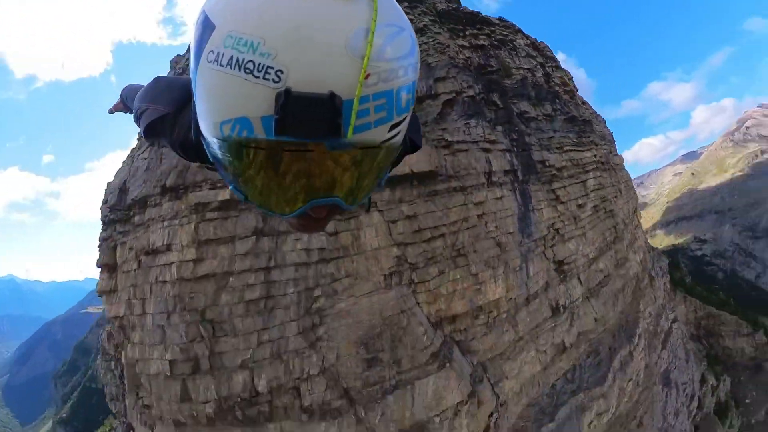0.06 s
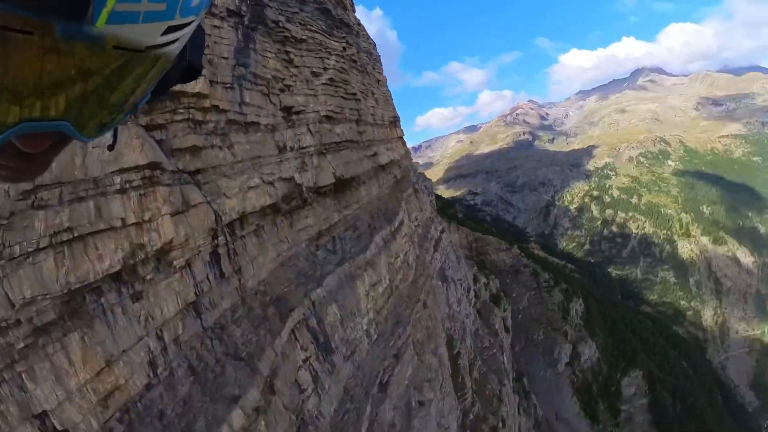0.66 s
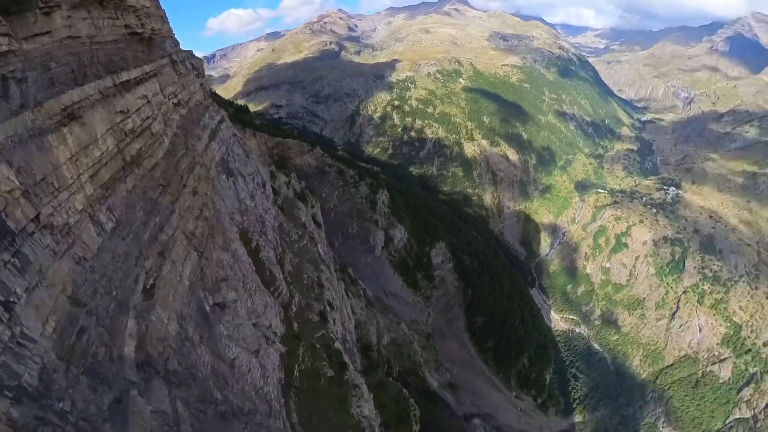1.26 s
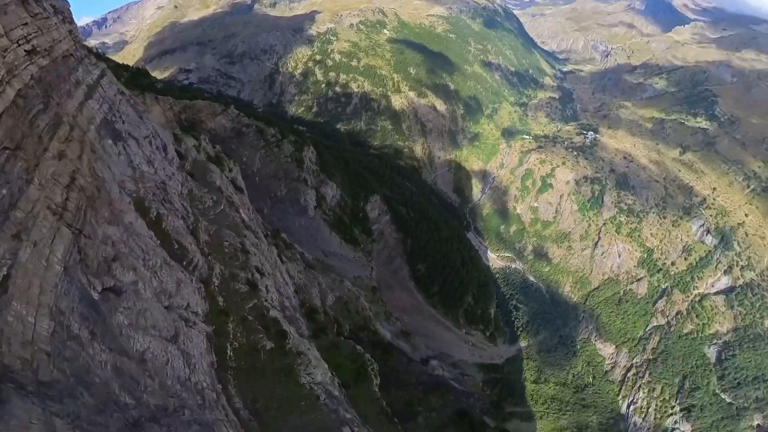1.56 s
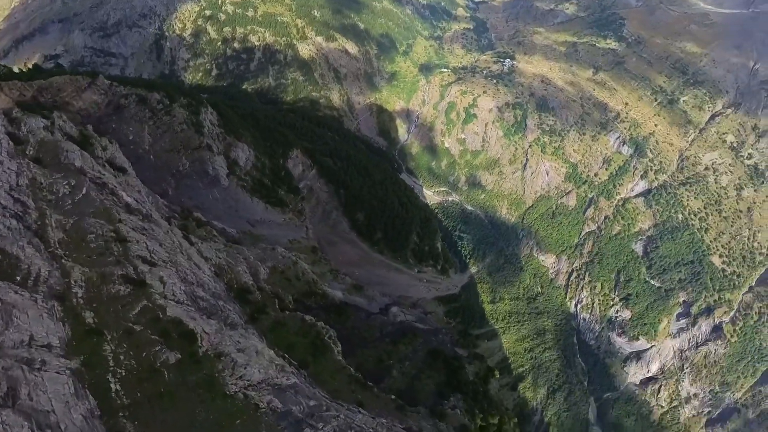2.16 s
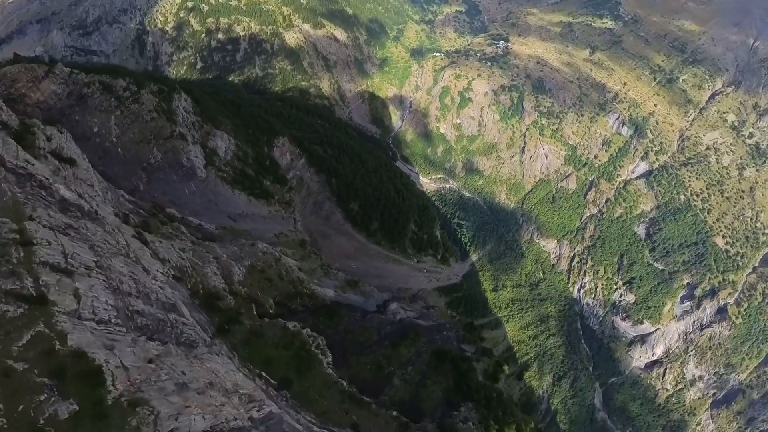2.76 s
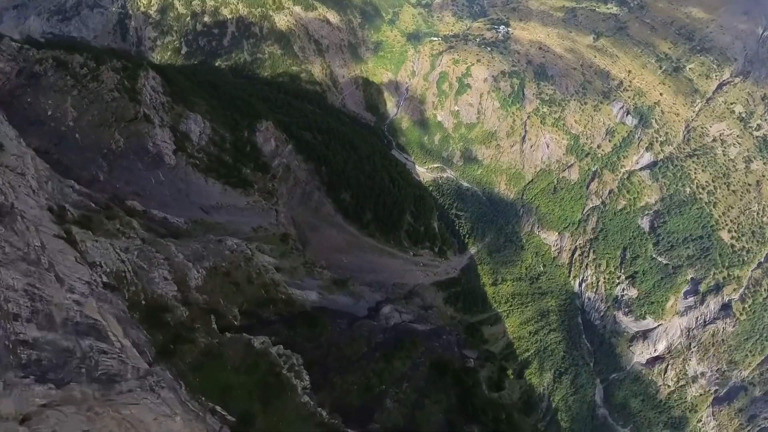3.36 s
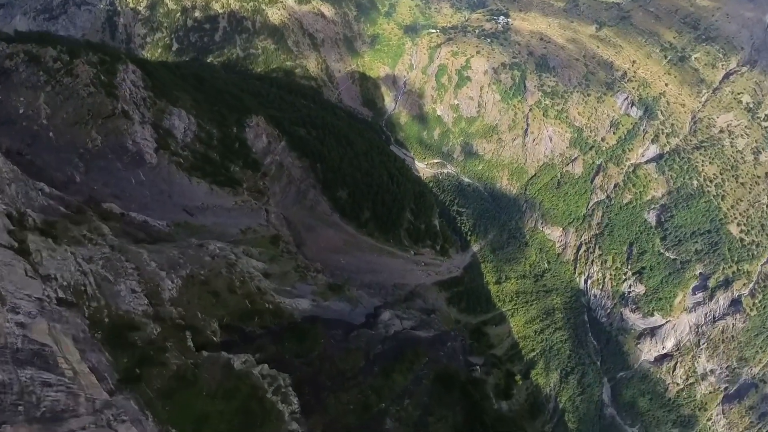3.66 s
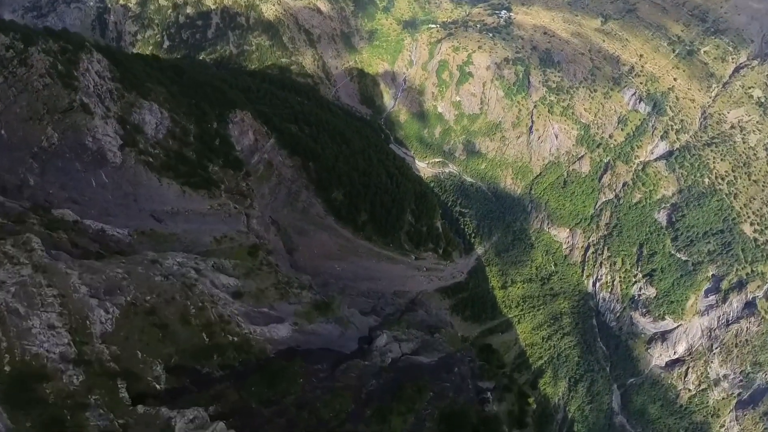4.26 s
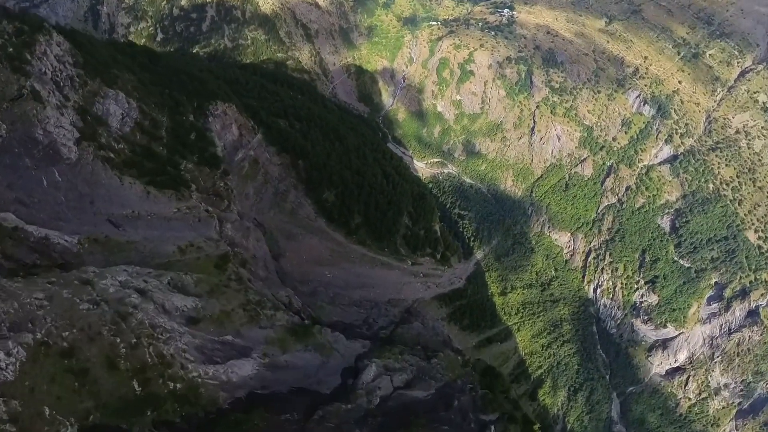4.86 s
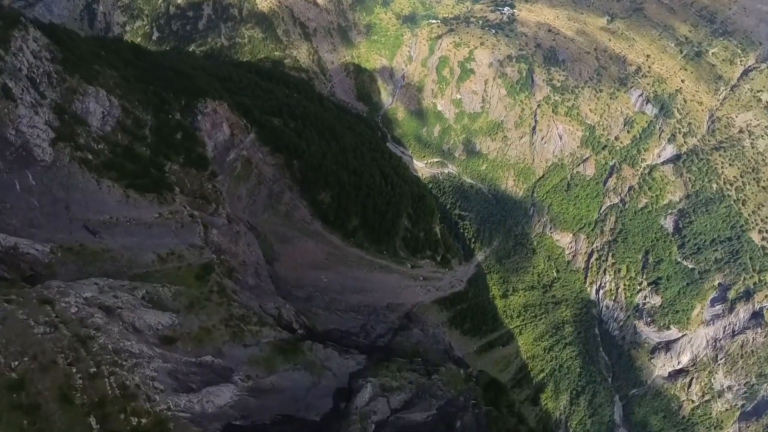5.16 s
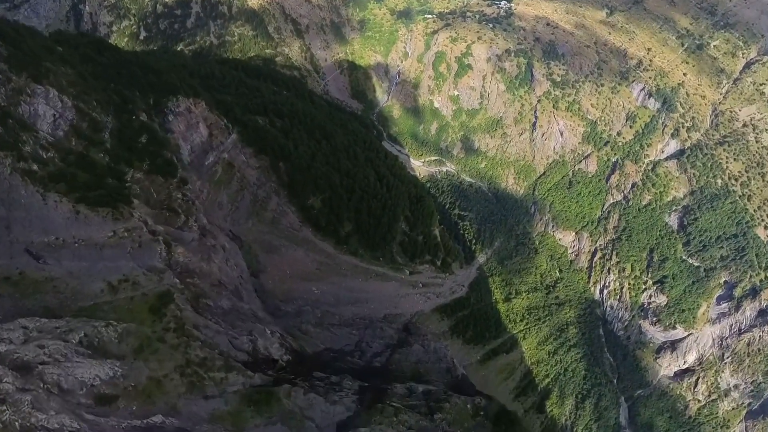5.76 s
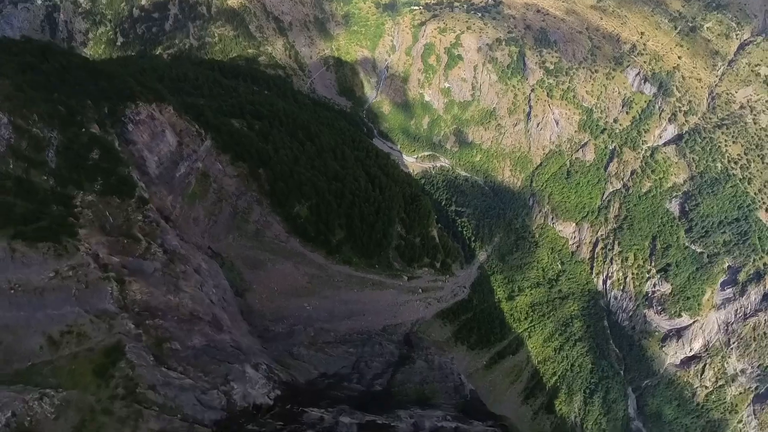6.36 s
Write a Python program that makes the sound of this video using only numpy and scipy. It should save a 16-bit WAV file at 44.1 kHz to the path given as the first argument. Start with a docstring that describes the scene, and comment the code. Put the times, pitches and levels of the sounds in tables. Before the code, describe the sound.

Wind pounds a small microphone carried by someone falling fast along a mountain cliff. A deep, steady rumble runs throughout. Over it, air hisses, snaps and tears away in ragged, crackling gusts, several in the first half. After a brief stretch of smoother rumble, harder popping gusts return, and a thin sizzle joins near the end.

```python
"""A deep, steady wind rumble, with hiss, crackle and ragged gusts on top.
Air rushes over a small camera falling fast along a mountain face. Eddies (whirls of air) beat on
its microphone and make the rumble. As the camera turns, air hisses and snaps across the port (the
microphone's opening), then tears away from the housing in gusts full of suction pops."""
import sys
import numpy as np
from scipy import signal
from scipy.fft import rfft, irfft, next_fast_len
from scipy.io import wavfile
from scipy.ndimage import uniform_filter1d

SR = 44100
rng = np.random.default_rng(int(sys.argv[2]) if len(sys.argv) > 2 else 0)


def wav_out(sig):
    """Save sig, one row per channel (or a flat mono array), as 16-bit PCM at SR to the path in sys.argv[1]."""
    wavfile.write(sys.argv[1], SR, np.round(np.clip(np.atleast_2d(sig).T, -1, 1) * 32767).astype(np.int16))


N = 291501
TIME = np.arange(N) / SR
# smooth air sweeping over the port: start_s, length_s, level_db, crest_fraction, attack_s, release_s
SWEEPS = [(0.019, 0.041, -58, 0.4, .008, 0.035), (0.477, 0.38, -60, 0.7, .008, .029),
          (1.138, 0.52, -39.5, 1, .008, 0.014), (1.965, 0.2, -42, 0.5, .008, 0.06),
          (2.359, 0.45, -38.5, 0.24, 0.011, .025), (2.976, 0.1, -44, 0.9, .008, 0.027),
          (3.171, 0.044, -35.5, 0.5, .008, .004), (3.242, 0.022, -36, 1, .008, .004),
          (3.265, 0.11, -44, 0.3, .006, .02), (3.341, 0.034, -35.5, 0.8, 0.011, .004),
          (3.38, 0.071, -35.5, 0.86, .003, .008), (3.577, 0.2, -40, 0.3, .004, 0.031),
          (3.772, 0.21, -39, 0.32, .008, 0.055), (4.516, 0.26, -44, 0.14, 0.007, .004),
          (4.782, 0.077, -50.5, 1, .004, .01), (4.863, 0.27, -38.5, 0.5, 0.014, 0.049),
          (5.303, 0.42, -42, 0.43, 0.0062, .029), (5.657, 0.56, -39, 0.32, 0.016, .029),
          (6.208, 0.26, -40, 0.5, .04, .029)]


def rumble(popping):
    """Large eddies pound the microphone, along with smaller ones and the slow heave of the wake."""
    # tone of each layer: pitch_hz, level_db
    large_tone = [(40, -41.5), (80, -14.5), (110, -3), (148, 2), (190, 0), (240, -10.5), (320, -21.5),
                  (600, -37.5), (4000, -100)]
    heave_tone = [(10, -54), (25, -39), (33, -14), (43, 7), (65, 9), (85, 6.5), (120, 6.5), (300, -94.5),
                  (2000, -100)]
    small_tone = [(100, -23.5), (170, -5), (235, 2.5), (310, -3), (450, -7), (700, -15), (1000, -20),
                  (1300, -25.5), (1600, -37), (2100, -38), (3200, -65), (14000, -77)]
    # loudness of each layer: time_s, level_db
    large_levels = [(0.0, -22.5), (0.45, -26), (0.95, -22), (1.25, -23.5), (2.3, -22), (2.54, -29),
                    (2.7, -19), (2.8, -29), (3.0, -21), (3.17, -28), (3.3, -21.5), (4.5, -21.5),
                    (4.7, -20.5), (4.85, -24), (5.45, -19.5), (5.58, -25), (5.69, -22), (5.75, -24),
                    (5.91, -22.5), (5.98, -22), (6.1, -22), (6.6, -19.5)]
    heave_levels = [(0.0, -34.5), (1.25, -31), (1.4, -34), (1.85, -28), (2.45, -35), (2.55, -28),
                    (2.8, -31), (2.95, -37), (3.8, -31), (3.95, -35.5), (5.7, -26.5), (5.8, -30),
                    (6.5, -27), (6.6, -30)]
    small_levels = [(0.0, -24), (0.2, -21), (0.42, -24), (.72, -21), (1.1, -20.5), (1.3, -24.5),
                    (1.75, -23), (2.3, -21), (2.52, -24.5), (2.7, -20), (3.1, -20.5), (3.5, -23.5),
                    (4.05, -23.5), (4.15, -22), (4.27, -24), (4.55, -21.5), (5.1, -24), (5.38, -22),
                    (6.0, -25.5), (6.3, -22), (6.6, -28.5)]
    # surges from the very largest eddies: crest_s, rise_db
    surges = [(0.09, 1.5), (0.27, 2.5), (0.95, 0.5), (1.15, 1.5), (1.91, 2), (2.04, 1.5), (2.25, 0.5),
              (2.88, -0.5), (3.319, 2), (3.57, 1), (3.72, 3), (3.93, 2), (4.15, 0), (4.44, 0.5), (4.75, 1),
              (4.84, 1), (5.33, 0.5), (6.12, 1.5), (6.33, 1), (6.47, 1)]
    large = steadied(coloured(noise(), large_tone), seconds=0.06) * amp(follow(large_levels) + 0.5)
    heave = steadied(coloured(noise(), heave_tone), seconds=0.25) * amp(follow(heave_levels) - 0.1)
    small = steadied(coloured(noise(), small_tone), seconds=0.11) * amp(follow(small_levels) - 0.6)
    surge_db = sum(db * np.exp(-((TIME - crest) / 0.047) ** 2) for crest, db in surges)
    breakup = np.hypot(1, popping / amp(-24.5))  # hard gusts break up the eddies, so the rumble dips
    return (amp(surge_db) * (large + small) + heave) / breakup


def gusts(attack_s=0.0044, release_s=0.017):
    """Strength of the tearing and the popping over time, as air breaks away from the housing."""
    # gusts: start_s, length_s, tearing_db, popping_db, crest_fraction
    gust_list = [(0.593, 0.34, -38.5, -37, 0.3), (1.135, 0.16, -34.5, -31, 0.3),
                 (1.289, 0.32, -32, -27.5, 0.61), (2.372, .11, -33.5, -38, 0.6),
                 (2.483, 0.287, -33, -27.5, 0.16), (4.908, 0.048, -37, -32, 0.3),
                 (4.957, 0.111, -34, -22, 0.85), (5.673, 0.25, -36.5, -23.5, 0.84),
                 (6.287, 0.22, -38, -29.5, 0.7), (6.505, 0.114, -40, -24.5, 0.9)]
    tearing = popping = 0
    for start, length, tear_db, pop_db, crest in gust_list:
        tearing += amp(tear_db) * swell(start, length, crest, attack_s, release_s, arch_db=1)
        popping += amp(pop_db) * swell(start, length, crest, attack_s, release_s, arch_db=12.5)
    tearing = np.hypot(tearing, amp(-51)) * amp(6)  # a little remains between gusts
    tearing = hushed(tearing, below_db=-39)  # weak flow clings on and hardly tears
    popping *= amp(2 * wander(top_hz=21.35))  # flutter within a gust
    return np.hypot([tearing, popping], slaps())


def slaps(rise_s=0.00067, fall_s=0.0018):
    """Extra tearing and popping strength that jumps up, holds while an eddy passes and dies fast."""
    # short slaps of air: start_s, tearing_db, popping_db, length_s
    slap_list = [(0.057, -36.5, -36, 0.008), (0.755, -27, -30, 0.0076), (0.774, -29, -32, 0.017),
                 (0.869, -30, -33, 0.016), (1.149, -26, -25.5, 0.011), (1.453, -34, -27, 0.019),
                 (1.538, -26, -23, 0.019), (1.584, -24, -25.5, 0.035), (3.189, -28.5, -29.5, 0.02),
                 (3.257, -23, -24.5, 0.0061), (3.36, -36, -28, 0.012), (3.427, -22, -21, 0.0081),
                 (4.972, -26, -18.5, 0.004), (5.009, -39, -20.5, 0.019), (5.052, -36, -19.5, .017),
                 (5.723, -29, -24, 0.015), (5.782, -39, -23.5, 0.024), (5.852, -37, -21.5, 0.019),
                 (5.882, -37, -26, 0.0094), (5.938, -29.5, -26.5, 0.016), (6.445, -29.5, -22, 0.0096),
                 (6.546, -36, -27.5, .016), (6.585, -35, -23.5, .026)]
    strengths = np.zeros((2, N))
    for start, tear_db, pop_db, length in slap_list:
        before = np.maximum(start - TIME, 0)
        after = np.maximum(TIME - start - length, 0)
        strengths += np.outer(amp([tear_db, pop_db]), np.exp(-before / rise_s - after / fall_s))
    return strengths


def suction_pops(strength, width_s=0.00032, spread_db=4):
    """Each eddy's core briefly sucks at the port. Harder gusts bring faster, louder pops."""
    # tone of the pops: pitch_hz, level_db
    tone = [(20, -36), (70, -19), (130, -5.5), (250, -0.5), (600, -1.2), (1300, 5), (1600, 1), (2100, 6),
            (2900, 1), (4200, -3), (8000, -22), (14000, -38)]
    base_per_s = 55 + 250 * strength / strength.max()
    t = np.arange(-256, 257) / SR
    pressure = np.zeros(N)
    for size in (0.25, 0.5, 1):  # wider cores are rarer and suck harder
        arrivals = rng.random(N) < base_per_s / np.sqrt(size) / SR
        depths = amp(spread_db * np.clip(noise(), -2, 1))
        dip = -size / (1 + (t / (width_s * size)) ** 2)
        pressure += signal.oaconvolve(arrivals * depths, dip, "same")
    pressure -= uniform_filter1d(pressure, size=1024)  # centre on zero
    return steadied(coloured(pressure, tone), seconds=0.011) * strength


def tear(swirl, strength):
    """Air ripping off the housing breaks into ragged bursts of tiny eddies."""
    # tone of the tearing: pitch_hz, level_db
    tone = [(30, -30), (100, -5.5), (300, 7.5), (600, 6), (1000, 3), (1350, -2), (1600, -9.5), (2000, -6),
            (2900, -7.5), (4200, -5), (6500, -15), (9000, -32), (14000, -66)]
    ragged = unit(noise() * amp(2.5 * swirl + 1.8 * wander(top_hz=34.8)))
    return steadied(coloured(ragged, tone), seconds=0.015) * strength


def snaps(wisp_db=-13, wisp_s=0.00028, leak_hz=260, dull_hz=9000):
    """One eddy hits the port: a sharp dip in pressure with a wisp of noise."""
    # the loudest snaps, from thin ticks to thuds: time_s, peak_db, width_s
    loud_snaps = [(.0127, -13, 0.0007), (.0407, -21, 0.00012), (.392, -25, .00008), (.414, -23, .00008),
                  (.458, -18.5, .0001), (.491, -23, 0.000093), (.507, -20, 0.00015), (.5417, -17, 0.00016),
                  (.6028, -14.5, .0001), (.6717, -20, .00016), (.7473, -11, 0.00016), (.7501, -17, .00008),
                  (.7856, -16, 0.0003), (.8211, -17, .0002), (.8825, -18, .00016), (.8889, -17, 0.00023),
                  (.939, -17, .00008), (1.1564, -13, 0.00029), (1.2491, -12, .00022),
                  (1.3894, -13, 0.00035), (1.3949, -7.5, 0.00011), (1.455, -7.5, 0.00058),
                  (1.5888, -16, .00024), (1.97, -23, .00005), (2.117, -28, 0.00011), (2.3786, -17, .00007),
                  (2.5122, -10, .00033), (2.6628, -11, 0.00017), (2.7031, -11, 0.00016),
                  (2.8059, -20, 0.00022), (3.015, -18, 0.000027), (3.05, -28, 0.000092),
                  (3.1928, -12, 0.00026), (3.2585, -13, .00025), (3.274, -15, .00006), (3.427, -8, 0.00037),
                  (3.431, -14.5, 0.00021), (4.9151, -15, .00012), (4.9428, -14.5, .00027),
                  (4.952, -13.5, .00009), (4.9739, -10, 0.00026), (5.7388, -16, .0002),
                  (5.7962, -12, .0003), (5.8898, -14, .00024), (5.9308, -10.5, .00026),
                  (6.2674, -18, 0.00022), (6.3009, -14, .00024), (6.3382, -12, .00032),
                  (6.3751, -24, .00015), (6.4284, -15, .00036)]
    out = np.zeros(N)
    lead = 64  # samples before the dip
    t = np.arange(-lead, 256) / SR
    # the port leaks away bass and dulls the treble
    port = signal.butter(2, [leak_hz, dull_hz], "band", fs=SR, output="sos")
    for when, db, width in list(loud_snaps) + faint_snaps():
        dip = -1 / (1 + (2 * t / width) ** 2)
        wisp = np.convolve(rng.standard_normal(len(t)), dip / np.linalg.norm(dip))[:len(t)]
        sound = signal.sosfilt(port, dip + amp(wisp_db) * wisp * np.exp(-abs(t) / wisp_s))
        start = max(round(when * SR) - lead, 0)
        out[start:start + len(t)] += amp(db) * sound / abs(sound).max()
    return out


def faint_snaps(per_sweep=2):
    """Unsettled air makes a few random snaps just after each sweep starts."""
    starts = np.repeat([row[0] for row in SWEEPS], per_sweep)
    delay, softness, breadth = np.clip(rng.standard_normal((len(starts), 3)), -2, 2).T
    time_s = starts + 0.04 * abs(delay)
    peak_db = -24.5 - 4 * abs(softness)
    width_s = 0.00005 * 2 ** (0.31 * breadth)
    return list(zip(time_s, peak_db, width_s))


def hiss(swirl, spits_per_s=60, spit_s=0.00011):
    """Air scrapes over the port's edge, fluttering with each eddy and spitting now and then."""
    # tone of the hiss: pitch_hz, level_db
    tone = [(700, -4), (1600, 2.5), (2100, 0.5), (3000, 0), (4200, 2.5), (7000, 0.5), (8500, -3.5),
            (10000, -9.5), (12000, -19), (15500, -36)]
    kicks = (rng.random(N) < spits_per_s / SR) * rng.random(N)
    spits = signal.lfilter([1], [1, -np.exp(-1 / (spit_s * SR))], kicks)
    scrape = unit(noise() * amp(1.67 * swirl + 0.58 * wander(top_hz=40)) * (1 + 1.9 * spits))
    sweeps = sum(amp(db) * swell(start, length, crest, attack, release, arch_db=6)
                 for start, length, db, crest, attack, release in SWEEPS)
    level = np.hypot(sweeps, amp(-55.5))  # a little remains between sweeps
    level *= amp(2 + 2.5 * wander(top_hz=5.1))
    return coloured(scrape, tone) * hushed(level, below_db=-49.5)  # slow air barely hisses


def jet(swirl, start_s=6.358, level_db=-34.5, attack_s=0.0052, fade_db_per_s=32):
    """A thin jet sizzles straight into the port and fades as the camera turns on."""
    # tone of the sizzle: pitch_hz, level_db
    tone = [(1000, 2), (4000, -7), (10000, -2.5), (14000, -9), (16000, -9)]
    age = np.maximum(TIME - start_s, 0)
    level = np.minimum(age / attack_s, 1) * amp(level_db - fade_db_per_s * age)
    return level * coloured(noise() * amp(0.89 * swirl), tone)


def rush():
    """Air streams around the whole camera: an even rush with a thin, airy hiss on top."""
    # loudness of each layer: time_s, level_db
    body_levels = [(0, -51), (.38, -55), (.5, -42), (1, -47.5), (1.5, -43.5), (2, -45.5), (2.6, -43),
                   (3.5, -47.5), (4.35, -48), (4.8, -47.5), (5.25, -48.5), (6.61, -43.5)]
    airy_levels = [(0, -55), (.36, -56.5), (.5, -50.5), (.72, -46.5), (1, -52), (1.6, -55), (2.3, -54),
                   (3.1, -68), (4.1, -81), (6.61, -48)]
    # tone of each layer: pitch_hz, level_db
    body_tone = [(500, 2), (1500, 5.5), (2100, 5.5), (3100, 1), (4100, 1.5), (5500, -4.5), (7500, -7),
                 (10300, -12), (11500, -16.5), (13000, -21), (15500, -40)]
    airy_tone = [(2000, -15), (4100, 5.5), (5500, -7), (7500, -3), (10400, -3), (11500, -7.5), (12500, -17),
                 (14000, -40)]
    body = coloured(noise() * amp(1.3 * wander(top_hz=25)), body_tone)
    airy = coloured(noise(), airy_tone)
    return amp(follow(body_levels)) * body + amp(follow(airy_levels)) * airy


def swell(start, length, crest, attack_s, release_s, arch_db):
    """Flow catches quickly, climbs by arch_db to its crest, sinks back, then lets go."""
    crest_s = start + np.clip(crest, 0.05, 0.95) * length
    t = TIME[::16]
    sag = np.interp(t, [start, crest_s, start + length], [-1, 0, 1]) ** 2
    attack = np.clip((t - start) / attack_s, 0, 1)
    release = np.exp(-np.maximum(t - start - length, 0) / release_s)
    return np.interp(TIME, t, attack * amp(-arch_db * sag) * release)


def amp(db):
    """Turns decibels into a multiplier."""
    return 10 ** (np.asarray(db) / 20)


def unit(x):
    """Scales a signal to an average power of 1."""
    return x / np.sqrt(np.mean(x ** 2) + 1e-20)


def noise():
    """Fresh white noise."""
    return rng.standard_normal(N)


def follow(rows):
    """Joins (time, level) points with straight lines."""
    return np.interp(TIME, *np.transpose(rows))


def hushed(level, below_db):
    """Turns weak levels down further."""
    return level / np.hypot(1, amp(below_db) / level)


def coloured(x, tone):
    """Filters a signal to the given tone, at an average power of 1."""
    hz, db = np.transpose(tone)
    size = 2 * next_fast_len(N // 2 + 4096)
    log_hz = np.log(np.fft.rfftfreq(size, 1 / SR) + 1)
    log_gain = np.log(amp(np.interp(log_hz, np.log(hz), db)))
    # make the filter ring only after a sound, never before it
    cepstrum = irfft(log_gain)[:size // 2]
    cepstrum[0] /= 2
    response = np.exp(rfft(2 * cepstrum, size))
    return unit(irfft(rfft(x, size) * response)[:N])


def wander(top_hz):
    """Random drift of power 1, mostly slower than top_hz."""
    size = next_fast_len(N)
    hz = np.fft.rfftfreq(size, 1 / SR)
    spectrum = rfft(rng.standard_normal(size)) / np.sqrt(1 + (hz / top_hz) ** 4)
    return unit(irfft(spectrum, size)[:N])


def steadied(x, seconds):
    """Evens out loudness over the given time, leaving faster swings free."""
    size = max(int(seconds * SR), 2)
    return x / np.sqrt(uniform_filter1d(uniform_filter1d(x ** 2, size), size) + 1e-9)


def scene():
    """One swirl shakes the tearing, hiss and jet; the same gusts tear, pop and weaken the rumble."""
    swirl = wander(top_hz=264)
    tearing, popping = gusts()
    wind = rumble(popping) + tear(swirl, tearing) + suction_pops(popping)
    return (wind + hiss(swirl) + rush() + jet(swirl) + snaps())[None]


def record(dry, ceiling=0.5, top_hz=15900):
    """Rounds off the biggest swings, then cuts the highest treble."""
    rounded = dry / (1 + (dry / ceiling) ** 6) ** (1 / 6)
    low_pass = signal.firwin(511, top_hz, window=("kaiser", 9), fs=SR)
    return signal.oaconvolve(rounded, low_pass[None], "same")


dry = scene()
out = record(dry)
wav_out(out)
```